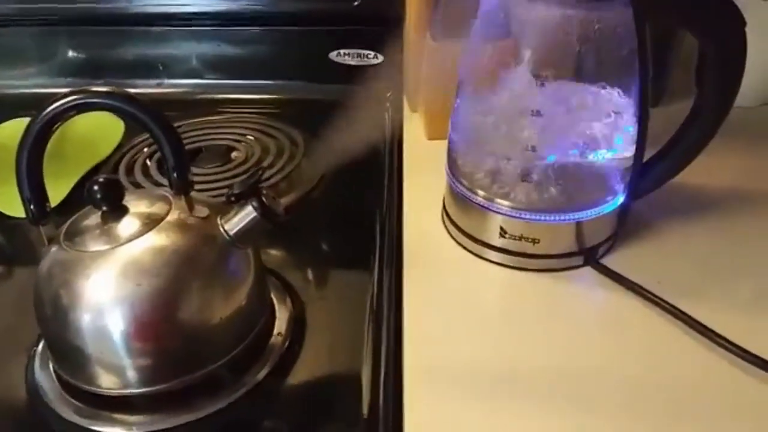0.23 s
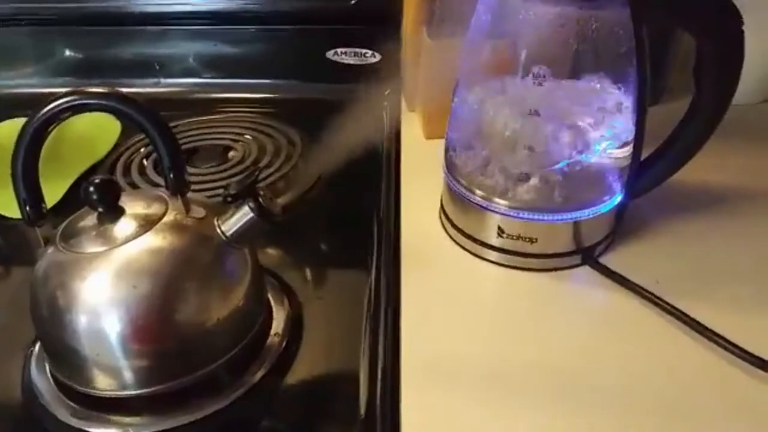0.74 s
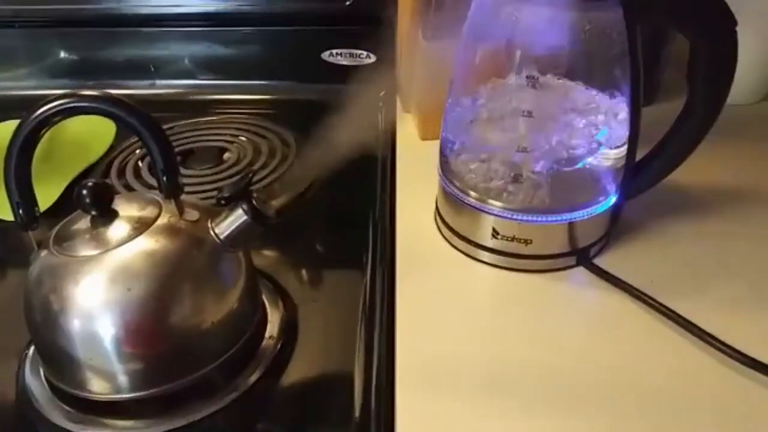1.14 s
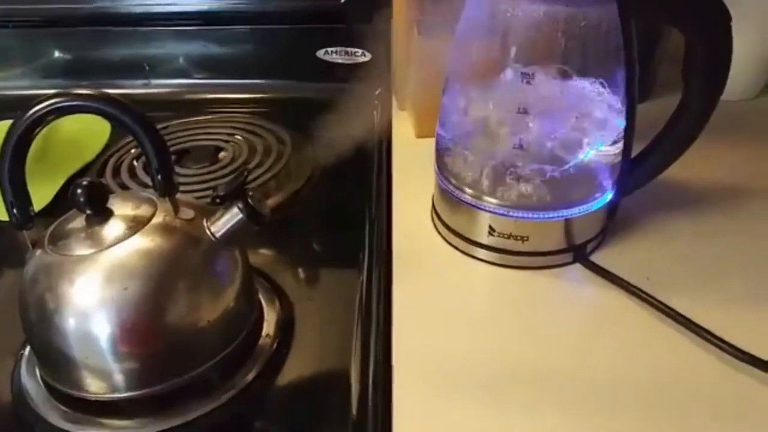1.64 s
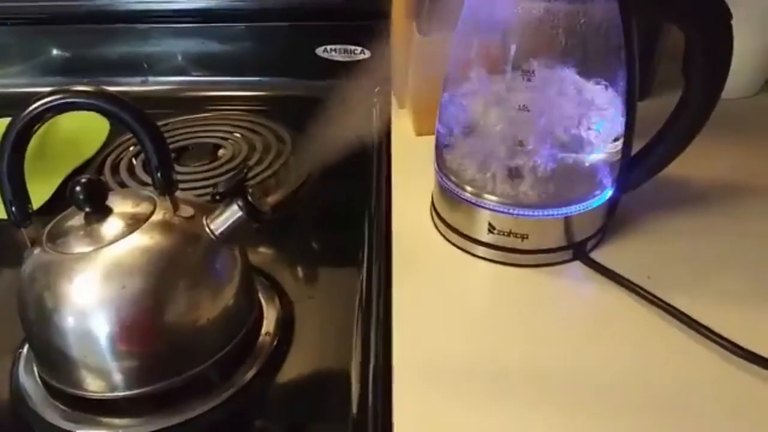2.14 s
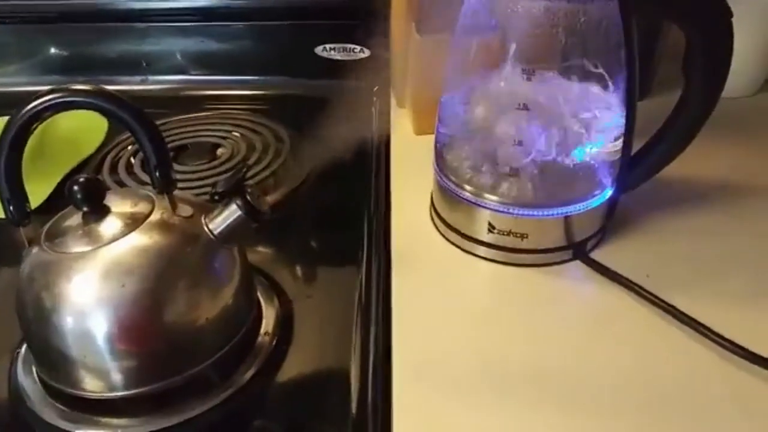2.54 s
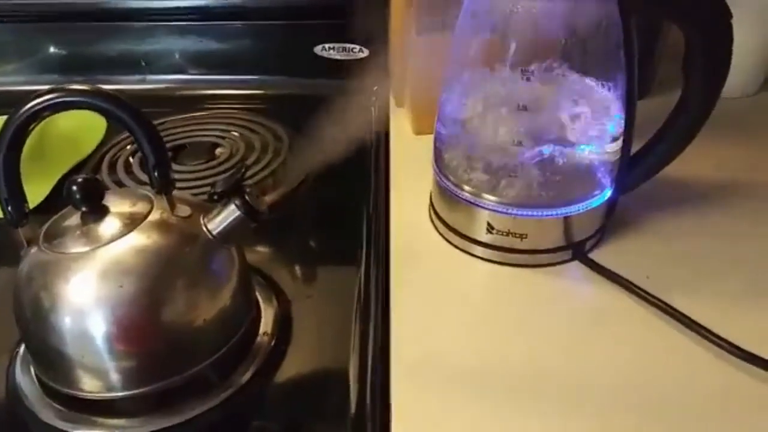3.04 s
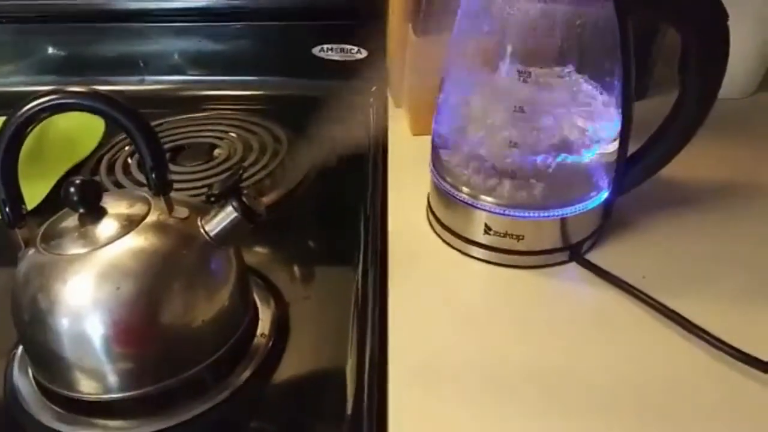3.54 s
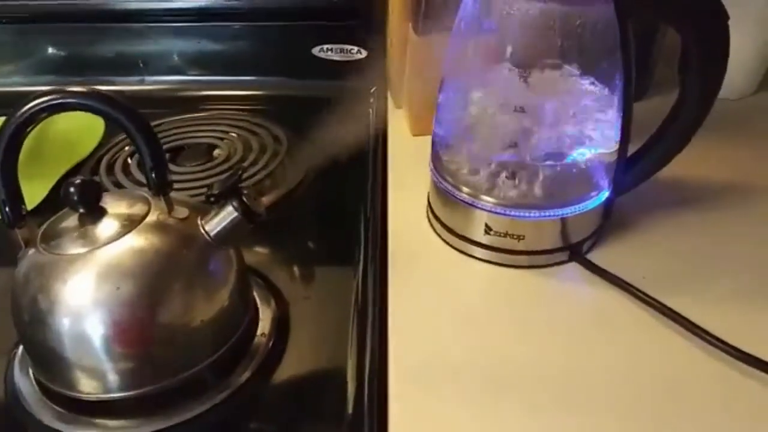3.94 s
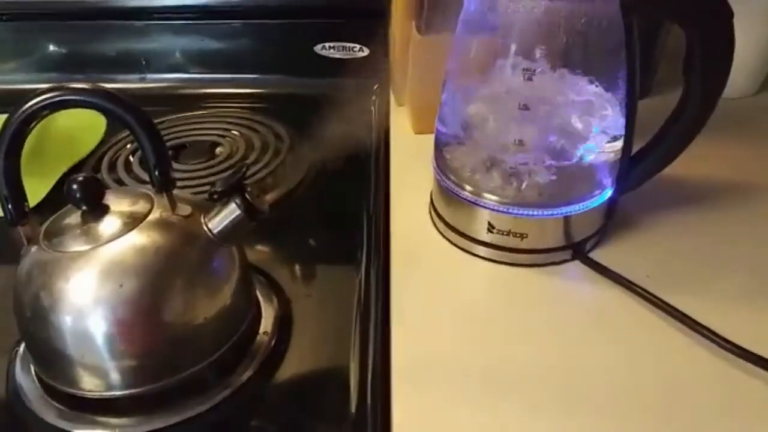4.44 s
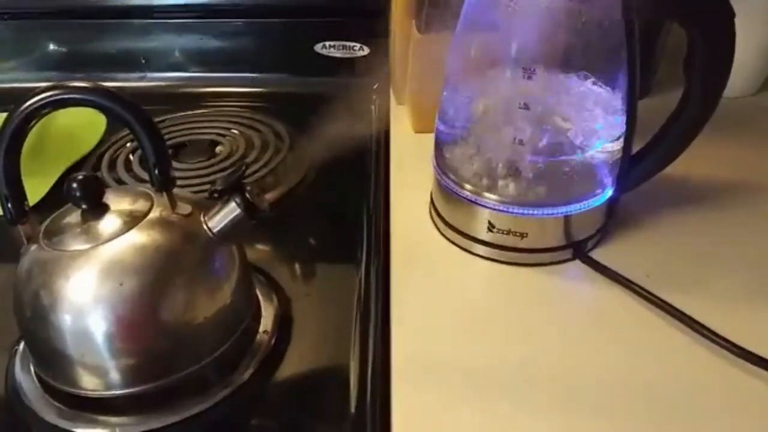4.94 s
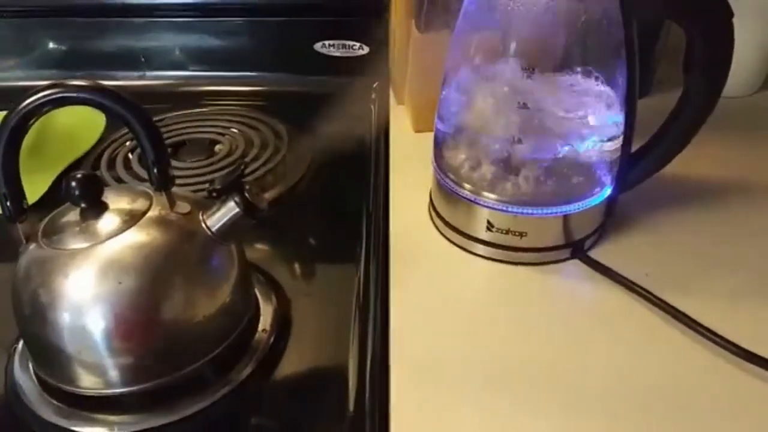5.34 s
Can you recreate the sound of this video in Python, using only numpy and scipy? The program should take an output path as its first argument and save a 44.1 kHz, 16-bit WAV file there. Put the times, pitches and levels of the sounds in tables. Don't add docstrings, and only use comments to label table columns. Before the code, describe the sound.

A stovetop kettle whistles shrilly up close, breathy and fluttering with steam hiss and crackling distortion, over another kettle's low boiling rumble.

```python
import sys
import numpy as np
from scipy import signal
from scipy.fft import rfft, irfft, next_fast_len
from scipy.io import wavfile
from scipy.ndimage import uniform_filter1d

SR = 44100
rng = np.random.default_rng(int(sys.argv[2]) if len(sys.argv) > 2 else 0)


def volts_from_db(level):
    exponent = np.asarray(level, float) / 20
    return 10 ** exponent


def unload_audio(sound):
    columns = np.transpose(np.atleast_2d(sound))
    steps = np.round(np.clip(columns, -1, 1) * 32767)
    wavfile.write(sys.argv[1], SR, steps.astype(np.int16))


N = 246959

# (time [s], pitch [Hz], steam pressure [dB])
WHISTLE_COURSE = [(0.0, 5574, -2), (0.43, 5566, -2.5), (0.62, 5468, 0.5), (0.78, 5552, -1),
                  (1.24, 5580, -3), (1.29, 5390, 0), (2.18, 5421, -3), (2.33, 5326, 1.5), (2.62, 5380, 1.5),
                  (2.72, 5280, 0), (2.85, 5520, 0.5), (3.55, 5433, -1.5), (3.85, 5334, 1),
                  (3.97, 5392, 2.5), (4.5, 5189, 2.5), (4.75, 5293, 1.5), (5.1, 5245, 2), (5.6, 5190, 0)]


def rms_one(x):
    return x / np.sqrt(np.mean(np.abs(x) ** 2) + 1e-20)


def in_time(rows):
    times, *columns = np.transpose(rows)
    return [np.interp(np.arange(N) / SR, times, column) for column in columns]


def wander(rate_hz, channels=1):
    r = np.exp(-2 * np.pi * rate_hz / SR)
    noise = rng.standard_normal((channels, N + SR))
    slow = signal.lfilter([1], [1, -2 * r, r * r], noise)
    return rms_one(slow[:, SR:])


def coloured(spectrum):
    hz = np.arange(1, N // 2 + 2) * SR / N
    points = np.array(spectrum)
    gain_db = np.interp(np.log(hz), np.log(points[:, 0]), points[:, 1], right=-90)
    return rms_one(irfft(rfft(rng.standard_normal(N)) * volts_from_db(gain_db), N))


def resonance(x, hz, width_hz):
    r = np.exp(-np.pi * width_hz / SR)
    turn = 2 * np.pi * hz / SR
    return signal.lfilter([1 - r * r, 0, r * r - 1], [2, -4 * r * np.cos(turn), 2 * r * r], x)


def hollow_tone():
    # (start [s], length [s], first pitch [Hz], last pitch [Hz], level [dB rms])
    soundings = [
        (0, 0.55, 584, 543, -51.5),
        (1.46, 0.13, 585, 638, -42),
        (1.891, .16, 625, 605, -43.5),
        (2.31, 0.14, 600, 617, -45),
        (3.251, 0.48, 630, 620, -53),
        (4.224, .33, 640, 601, -49.5),
        (4.56, .36, 610, 625, -48),
    ]
    arch_hz, attack_s, sag_db_per_s = 30, 0.013, 9
    t = np.arange(N) / SR
    out = np.zeros(N)
    waver, flicker = wander(rate_hz=14.7, channels=2)
    for start, length, first_hz, last_hz, level_db in soundings:
        done = np.clip((t - start) / length, 0, 1)
        arch = arch_hz * (start > 0) * np.sin(np.pi * done)
        pitch_hz = first_hz + (last_hz - first_hz) * done + arch + 4 * waver
        tone = np.sqrt(2) * np.sin(2 * np.pi * np.cumsum(pitch_hz) / SR)
        fade = np.clip(np.minimum(t - start, start + length - t) / attack_s, 0, 1)
        out += fade * volts_from_db(level_db - sag_db_per_s * length * done + 2.9 * flicker) * tone
    return out


def glass_kettle():
    # (frequency [Hz], width [Hz], level [dB rms])
    vessel = [
        (239, 78, -49.5),
        (377.3, 79, -46.5),
        (1274, 63, -49.5),
    ]
    # (frequency [Hz], level [dB per Hz])
    rumble_spectrum = [(20, -22), (80, -5), (150, -13), (220, 3), (370, 8.5), (510, 1.5), (1000, 0.5),
                       (2000, 1), (4000, 5.5), (5200, -19)]
    bubbles_per_s = 350 * volts_from_db(4.0 * wander(rate_hz=8)[0])
    born = rng.random(N) < bubbles_per_s / SR
    size_db = 3.0 * np.minimum(rng.exponential(1, N), 4)
    bursts = born * volts_from_db(size_db) * rng.choice([-1, 1], N)
    drive = rms_one(bursts) + 0.48 * rng.standard_normal(N)
    rings = np.zeros(N)
    for hz, width_hz, level_db in vessel:
        once = resonance(drive, hz, 0.86 * width_hz)
        twice = resonance(once, hz, 0.86 * width_hz)
        rings += volts_from_db(level_db) * rms_one(twice)
    rumble_db = -38.5 + 0.5 * wander(rate_hz=11.4)[0]
    return rings + volts_from_db(rumble_db) * coloured(rumble_spectrum)


def bells(rows):
    t = np.arange(N) / SR
    return sum(db * 2. ** -(2 * (t - middle) / length) ** 2 for middle, length, db in rows)


def pressure_db():
    # (middle [s], length [s], gain [dB])
    puffs = [(0.163, 0.023, 6), (0.21, 0.02, 7.5), (0.352, 0.022, 5), (0.538, 0.019, 3.8),
             (0.614, 0.023, 3.5), (0.689, 0.023, 7), (0.94, 0.017, 3.5), (1.07, 0.022, 5.9),
             (1.34, 0.018, 1.5), (1.406, 0.022, 4.5), (1.634, 0.035, 8.5), (1.991, 0.024, 6),
             (2.125, 0.022, 11), (2.199, 0.025, 7.5), (2.365, 0.022, 5.0), (2.625, 0.021, 5.5),
             (2.674, 0.025, 7.5), (2.724, 0.017, 7), (2.808, 0.018, 4), (3.194, 0.022, 3),
             (3.399, 0.036, 6), (3.5, 0.02, 5.5), (3.819, 0.023, 7), (3.888, 0.041, 6.5),
             (3.978, 0.019, 5.5), (4.077, 0.028, 5.5), (4.229, 0.03, 7.5), (4.342, 0.013, 8),
             (4.9, 0.078, 5.0), (5.501, 0.021, 7.5)]
    # (middle [s], length [s], loss [dB])
    lulls = [(1.201, 0.039, 6), (1.374, 0.025, 11), (1.591, 0.029, 11), (1.763, 0.04, 6.5),
             (2.316, 0.021, 8), (2.44, 0.019, 8), (2.551, 0.037, 6.5), (2.935, 0.031, 6), (3.003, 0.016, 1),
             (3.139, 0.042, 2.5), (3.263, 0.033, 9), (3.742, 0.042, 6.5), (3.939, 0.039, 8.5),
             (4.029, 0.023, 11), (4.269, 0.027, 10), (4.726, 0.037, 7), (4.967, 0.019, 4.5),
             (5.29, 0.056, 10)]
    return in_time(WHISTLE_COURSE)[1] + bells(puffs) - bells(lulls)


def spout():
    # (frequency [Hz], level [dB per Hz])
    jet_spectrum = [(2500, -33.5), (3800, -15), (4700, 5.5), (5400, 8), (6400, 5), (7400, 7), (8400, -6),
                    (9300, -6), (10700, -12), (12000, -21.5), (12900, -26), (13600, -27), (14600, -30),
                    (15600, -14)]
    whistle_db = -14.5 + 0.4 * pressure_db()
    hiss_db = -19 + 0.96 * wander(rate_hz=17)[0]
    pitch_hz = in_time(WHISTLE_COURSE)[0] + 75 * wander(rate_hz=18)[0]
    real, imaginary = wander(rate_hz=173, channels=2)
    envelope = rms_one(0.5 + real + 1j * imaginary)
    spin = np.exp(2j * np.pi * np.cumsum(pitch_hz) / SR)
    tone = np.sqrt(2) * np.real(envelope * spin)
    return volts_from_db(whistle_db) * tone + volts_from_db(hiss_db) * coloured(jet_spectrum)


def surfaces(x):
    # (delay [ms], gain [ratio])
    echoes = [(1.029, -0.1), (1.301, 0.13), (1.421, -0.07), (1.564, -0.16), (1.86, -0.09), (2.9, -0.13),
              (3.844, 0.16), (4.1, -0.12), (4.3, 0.09), (4.551, -0.1), (5.502, -0.07), (5.837, -0.09),
              (6.126, 0.07), (6.311, 0.09), (6.414, -0.09), (6.889, 0.08), (7.074, 0.1), (7.627, 0.07),
              (8.107, -0.09), (8.546, 0.05)]
    # (frequency [Hz], width [Hz], boost [dB])
    body_rings = [(4535, 59, 7), (4956, 64, -6), (5135, 50, -5), (5232, 45, -2), (5375, 50, 1),
                  (5515, 60, -4), (6260, 15, -13), (6435, 49, 8), (6925, 34, -5), (7376, 120, -10),
                  (7767, 120, -2), (8695, 81, 8), (9144, 20, -3), (10650, 80, -1), (12250, 90, 0)]
    # (frequency [Hz], width [Hz], depth [0-1])
    notches = [(4497, 150, .79), (4682, 150, .59), (4854, 55, .32), (5023, 20, .3), (5297, 40, .45),
               (5455, 30, .4), (5865, 150, .28), (6149, 150, .56), (6428, 150, .8), (6532, 142, .6),
               (6915, 150, .44), (7126, 33, .46), (7925, 22, .15), (8708, 150, .74)]
    response = np.zeros(SR // 10)
    response[0] = 1
    for delay_ms, gain in echoes:
        response += 0.8 * gain * np.sinc(np.arange(len(response)) - delay_ms * SR / 1000)
    response = response + sum(volts_from_db(boost_db) * resonance(response, hz, width_hz)
                              for hz, width_hz, boost_db in body_rings)
    for hz, width_hz, depth in notches:
        response = response - depth * resonance(response, hz, width_hz)
    return signal.fftconvolve(x, response)[:N]


def scene():
    whistle = surfaces(spout())
    return (whistle + glass_kettle() + hollow_tone())[None]


def limit(x, top):
    knee = 11.6
    drive = np.abs(signal.hilbert(x, next_fast_len(N)))[:, :N] / top
    return x / (1 + drive ** knee) ** (1 / knee), drive


def overload(x):
    # (frequency [Hz], level [dB per Hz])
    rasp_spectrum = [(30, -29), (300, 3), (600, 11.5), (1500, 19.5), (2200, 16.5), (3200, 18.5), (4200, 6),
                     (7400, 22), (9000, 11), (11000, 6), (13000, -27), (15500, 1)]
    x, drive = limit(x, top=0.75)
    excess = np.clip(uniform_filter1d(drive, size=20) - 0.8, 0, 1.0) ** 0.31
    rasp_db = -32.5 + 0.71 * pressure_db()
    x = x + volts_from_db(rasp_db) * rms_one(excess) * coloured(rasp_spectrum)
    return limit(x, top=0.78)[0]


def dropouts(x):
    # (middle [s], length [s], depth [dB])
    losses = [
        (4.146, .007, -22),
        (5.124, .006, -20),
    ]
    t = np.arange(N) / SR
    whistle_band = signal.butter(4, [3600, 11500], "band", fs=SR, output="sos")
    kept = signal.sosfiltfilt(whistle_band, x)
    dip_db = sum(depth_db * np.exp(-((t - middle) / length) ** 4) for middle, length, depth_db in losses)
    return kept + (x - kept) * volts_from_db(dip_db)


def top_cut(x):
    return signal.sosfilt(signal.butter(12, 15110, fs=SR, output="sos"), x)


def record(dry):
    x = overload(dry)
    x = signal.sosfilt(signal.butter(1, 90, "high", fs=SR, output="sos"), x)
    return top_cut(dropouts(x))


dry = scene()
out = record(dry)
unload_audio(out)
```